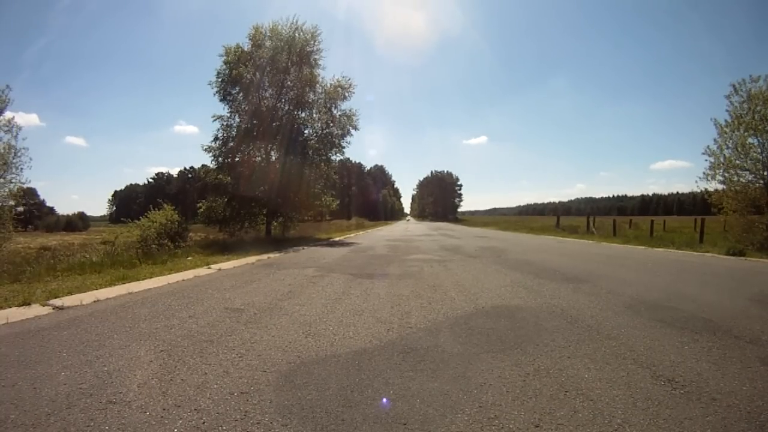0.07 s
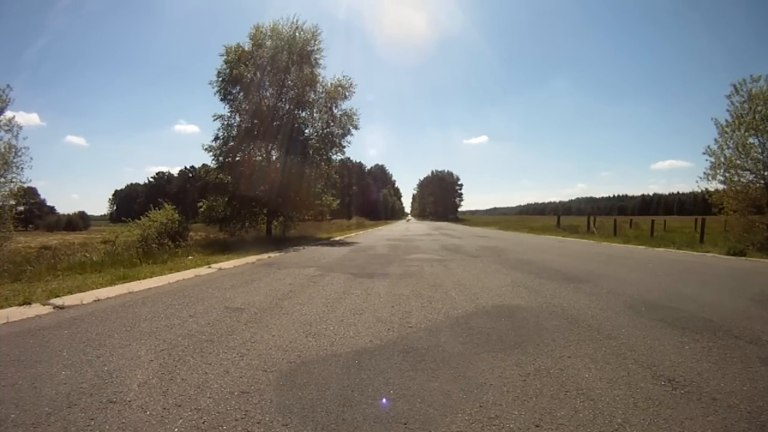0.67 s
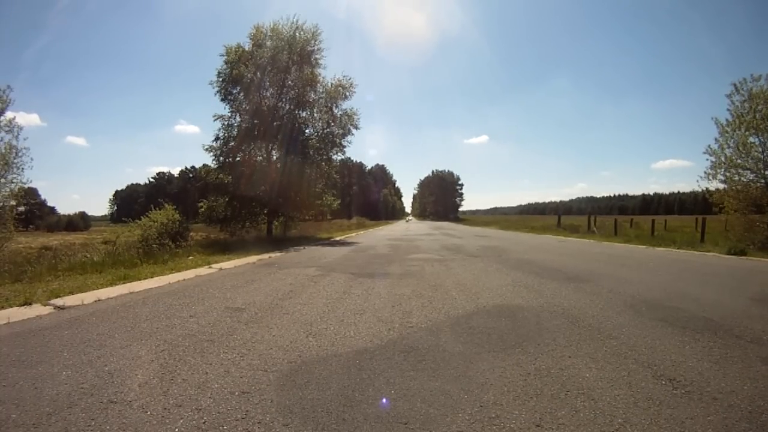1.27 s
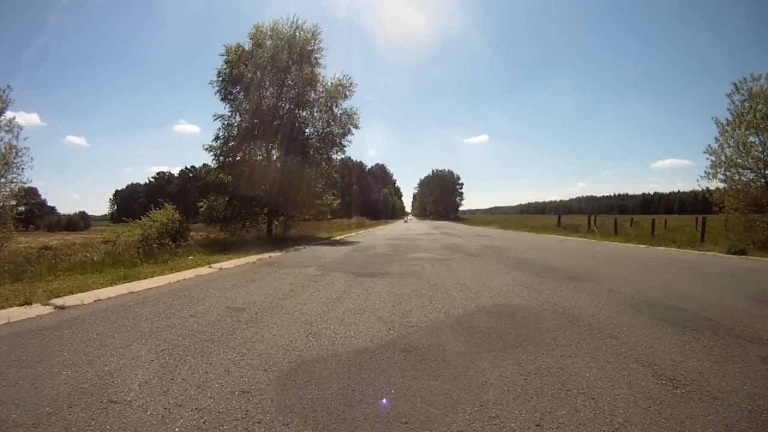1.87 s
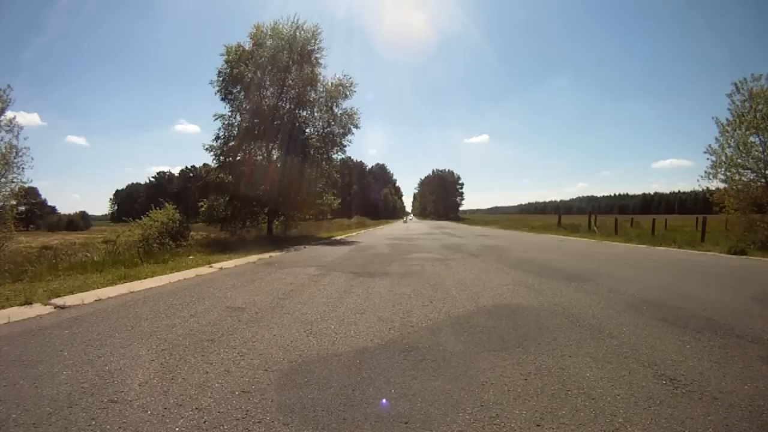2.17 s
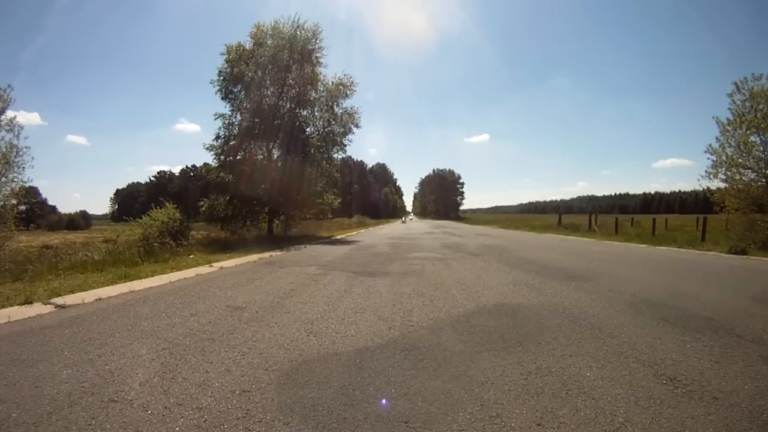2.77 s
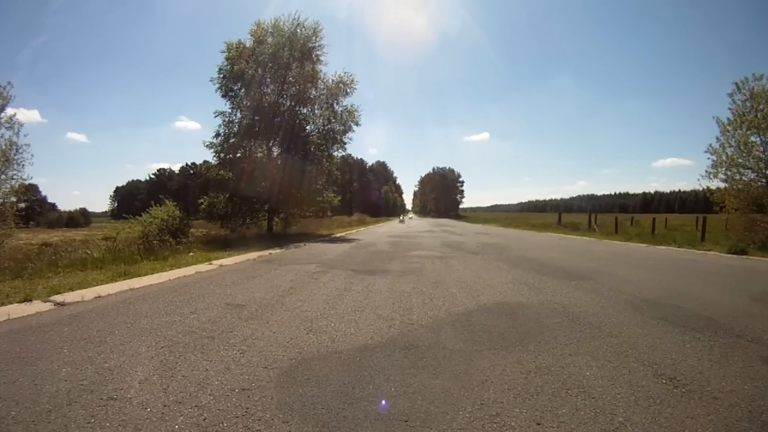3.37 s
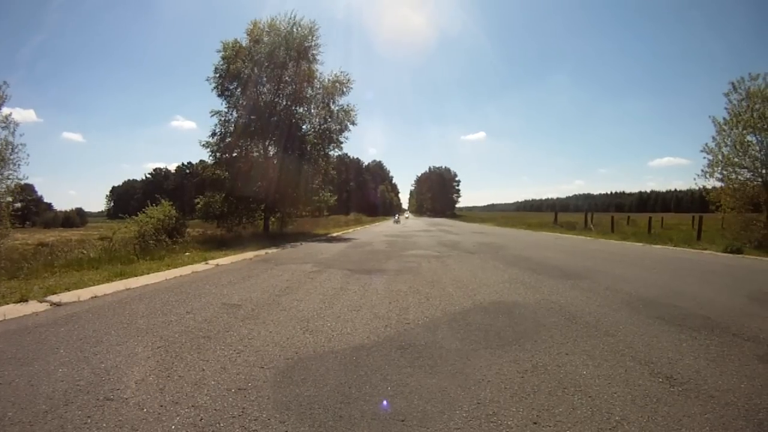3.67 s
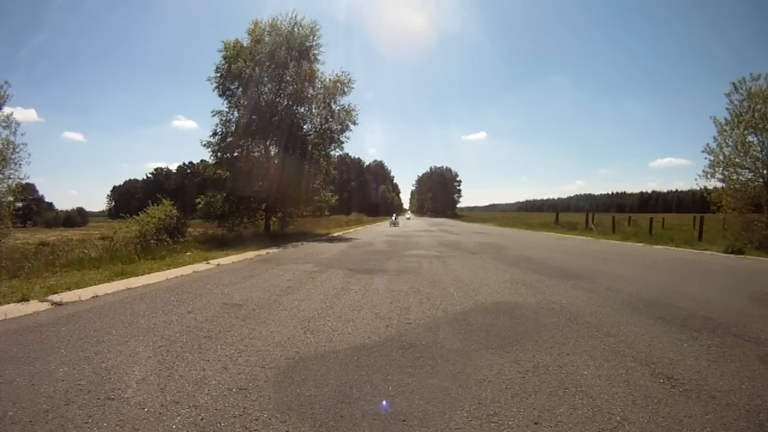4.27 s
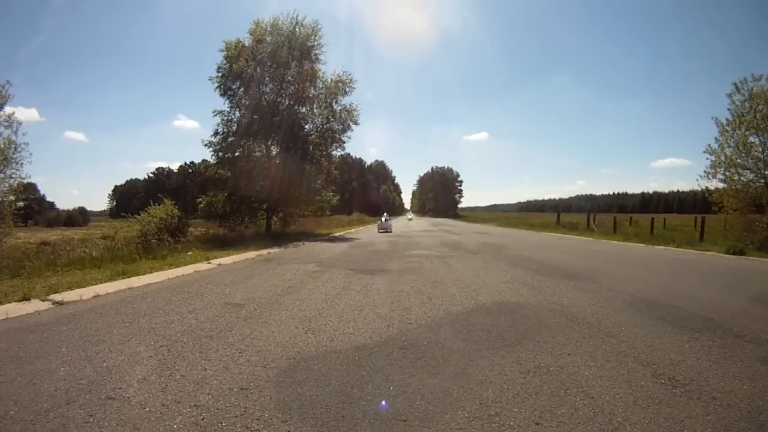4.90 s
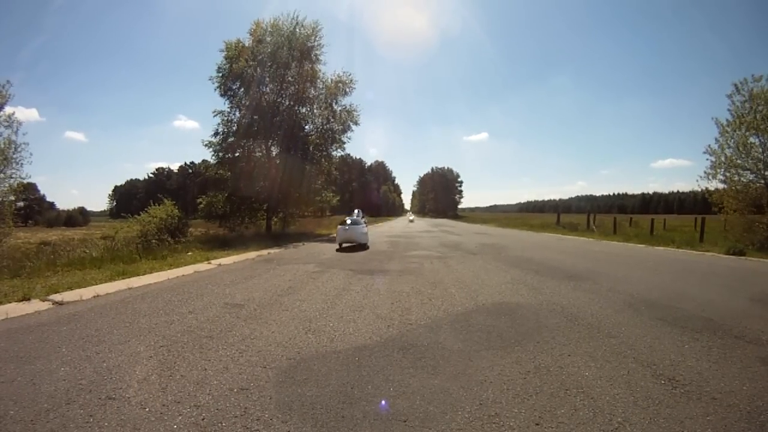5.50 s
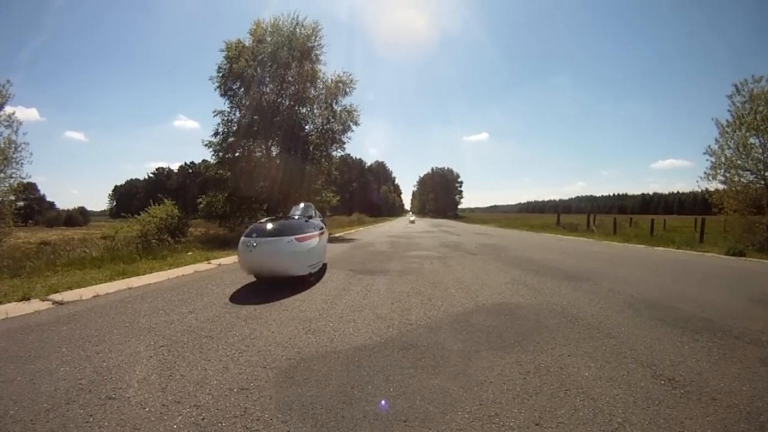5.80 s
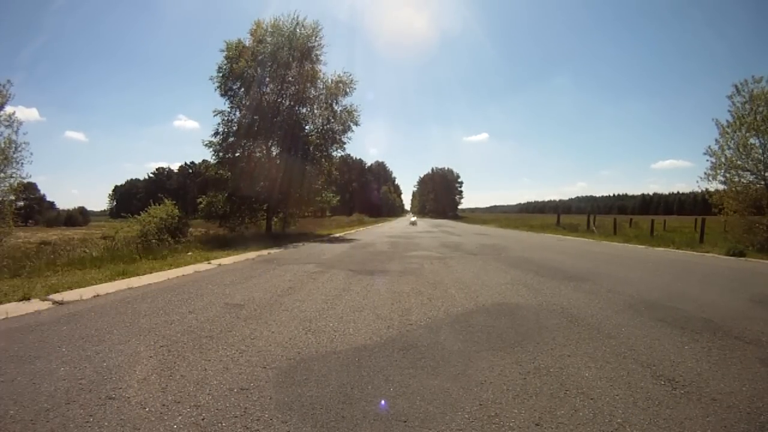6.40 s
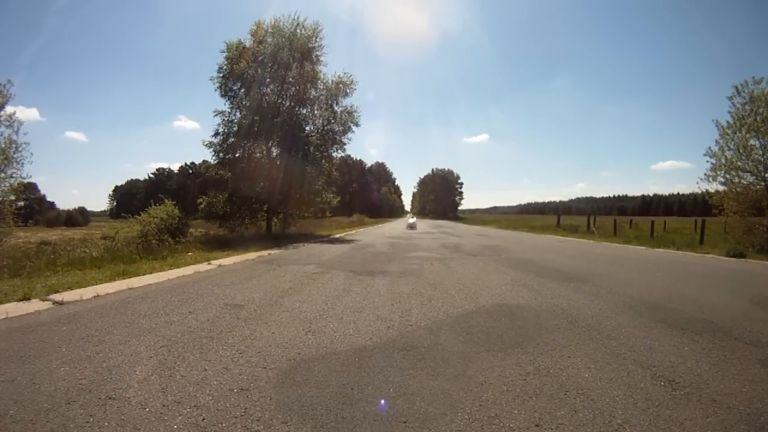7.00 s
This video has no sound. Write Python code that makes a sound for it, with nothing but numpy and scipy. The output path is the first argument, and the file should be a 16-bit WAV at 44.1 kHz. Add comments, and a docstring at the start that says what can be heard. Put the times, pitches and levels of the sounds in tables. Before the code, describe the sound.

A distant rolling rumble and tyre hiss grow out of the soft hush of fields, with faint bird chirps and a few tiny dry ticks. A shell-bodied pedal vehicle is coming fast along the asphalt. It whooshes past close to the low microphone, its hollow drone falling in pitch as bumps knock the shell and its wake buffets the microphone, then starts fading away.

```python
"""A country road, with a small camera standing on the asphalt; a velomobile passes 3.2 m off at 20 m/s.
Its tyres hiss on the grit and drum on the hollow shell, whose note drops as it goes by; bumps knock
the shell and the wake drags a gust over the microphone. Around it: the hush of fields, birds in the
trees, puffs of breeze, a few dry ticks. The camera samples slowly and holds each sample, which mirrors
everything into the treble."""
import sys
import numpy as np
from scipy import signal
from scipy.fft import rfft, irfft
from scipy.io import wavfile
from scipy.ndimage import uniform_filter1d, map_coordinates

SR = 44100
rng = np.random.default_rng(int(sys.argv[2]) if len(sys.argv) > 2 else 0)


def dump_mix(stems):
    """Bounce the given channels to the path in sys.argv[1] as a 16-bit WAV at rate SR."""
    frames = np.atleast_2d(stems).T  # one column per channel
    limited = np.clip(frames, -1, 1)  # hard clip at full scale
    pcm = np.round(limited * 32767).astype(np.int16)
    wavfile.write(sys.argv[1], SR, pcm)


N = 310905
TIME, BINS = np.arange(N) / SR, np.maximum(np.fft.rfftfreq(N, 1 / SR), 1)
PASS_S, MISS_M, SPEED_M_S = 6.23, 3.2, 20.0   # when and how near it passes the microphone, how fast
VIEW_DEG = [15, 42, 66, 148]   # bearings that show the microphone its nose, quarter, flank and tail

# swings of the rolling noise, distance aside: t/s, rumble and drumming level/dB, hiss level/dB
ROLLING_LEVELS = [(0.0, 1.3, -1), (1.2, 5.5, 0.5), (1.48, 7, 5.5), (2.7, 3.5, 5.5), (4.25, -0.1, 0.5),
                  (5.45, -1, 1.5), (5.64, -1, -3), (5.8, 1, 0.8), (6.37, -1, -0.5), (6.425, 0.5, 1.5),
                  (6.49, -1.7, -2), (6.65, -0.3, -2.5), (7.05, 0, 2)]
# coarse stretches of asphalt: t/s, length/s, added level/dB
COARSE_ASPHALT = [(4.57, 0.25, 5), (5.09, 0.14, 3), (5.55, 0.16, 4), (5.88, 0.13, 2), (6.19, 0.1, 0.5)]
# road rumble, heard from ahead and from behind: f/Hz, relative level/dB
RUMBLE_COMING = [(25, -26), (42, -16), (58, -1.5), (100, -0.5), (170, 0.1), (220, -2.5), (265, -9.5),
                 (350, -6), (470, -8.5), (600, -7.5), (800, -47), (1500, -47.5)]
RUMBLE_GOING = [(25, -28), (42, -34), (58, 0), (110, 0.5), (160, -3), (205, -1.5), (295, 4), (350, -6),
                (440, -6.5), (600, -2), (800, -25), (1500, -44.5)]
# resonances of the shell, and bands of the hiss heard head-on: f/Hz, width/Hz, relative level/dB
SHELL_MODES = [(579.3, 42.4, -0.5), (521.5, 79, -5), (396, 110, -16), (640, 120, -21)]
NOSE_BANDS = [(811, 116, 2.5), (938, 82, -0.5), (1145, 120, 1.3), (1247, 163, 3.5), (1617, 133, 4.5),
              (1780, 270, -0.5), (2265, 264, 1), (2573, 110, 4), (2898, 270, 1.5), (3320, 380, -6),
              (3800, 220, -11), (4730, 1400, -18)]
# tyre hiss from the other three sides, and its finest sizzle: f/Hz, relative level/dB
QUARTER_SPECTRUM = [(400, -10), (750, -3), (950, 3), (1130, -5), (1350, 2.5), (1680, -1), (2020, -6),
                    (2250, 0.5), (2700, -4.5), (3020, 5), (3450, -13), (4200, -17), (5000, -17.5),
                    (5900, -21)]
FLANK_SPECTRUM = [(400, -27), (700, -5), (870, 6), (1200, 2.5), (1500, -2.5), (1950, 1), (2120, 6),
                  (2700, 7), (3220, 3), (3500, -7), (4400, -7.5), (5200, -14), (5900, -11)]
TAIL_SPECTRUM = [(400, 3.5), (690, 10.5), (770, -0.5), (920, 6.5), (1400, -2.5), (1600, 1), (1880, -4),
                 (2200, 2.5), (2420, 0.5), (2950, 2), (3600, -10), (4400, -17), (5000, -18), (5900, -27)]
SIZZLE_SPECTRUM = [(2500, -25), (3600, 0), (4400, 7), (5200, -5), (5900, -10)]
# hush of the fields; breeze and wake on the microphone: f/Hz, relative level/dB
FIELD_SPECTRUM = [(30, 20), (200, 8.5), (600, 7), (800, 4), (1400, -1.5), (2400, -3), (3300, -2),
                  (4500, -5), (5300, -4.5), (5900, -4.5)]
BREEZE_SPECTRUM = [(10, -9), (25, 2.5), (55, -3), (90, -10.5), (160, -11), (400, -42), (900, -70)]
WAKE_SPECTRUM = [(20, -26), (38, -14), (50, 3), (66, 0), (85, -5), (130, -19), (300, -44), (900, -75)]
# bird note shapes by name: share of the note spent fading, pitch ratios at even steps
NOTE_SHAPES = {"swoop": (.3, [1.02, 1, .99, 1.01, 1.05, 1.09, 1.09]),
               "rise": (.4, [.94, .975, 1.01, 1.045, 1.06, 1.055]), "level": (.6, [.97, 1, 1.015, 1.01]),
               "sag": (.6, [1.025, 1.01, .99, .965]), "slur": (.85, [1.38, 1.18, 1.02, .9, .8]),
               "hook": (.5, [.95, .975, 1, 1.025, 1, .9, .79]),
               "dip": (.2, [1.34, 1.16, 1.02, 1, 1.04, 1.13, 1.21]),
               "flick": (.4, [.9, .92, .99, 1.09, 1.17])}
# single calls: t/s, length/s, f/Hz, level/dB, echo re note/dB, shape
BIRD_CALLS = [(0.071, 0.12, 2977, -54.5, -3.5, "swoop"), (0.545, 0.074, 3770, -67, -3, "level"),
              (0.659, 0.06, 4340, -62, -1, "sag"), (0.8, 0.098, 3055, -54.5, -4.5, "rise"),
              (0.944, 0.11, 2245, -63.5, -11, "level"), (5.718, 0.041, 3980, -52, 2, "sag")]
# repeated notes: t/s, count, period/s, length/s, f/Hz, first level/dB, step/dB, echo re note/dB, shape
BIRD_PHRASES = [(1.277, 2, 0.099, 0.028, 5050, -66, 1, -2, "sag"),
                (2.823, 2, 0.168, 0.036, 4420, -72, 1, 11.5, "flick"),
                (3.968, 3, 0.16, 0.029, 4700, -69, -1, -8, "sag"),
                (4.704, 4, 0.101, 0.061, 4520, -56, 1.9, -4, "hook"),
                (5.127, 3, 0.172, 0.096, 3844, -51.5, 1.5, -4, "dip"),
                (5.641, 2, 0.21, 0.062, 3770, -49, 2, 3, "flick")]
# one bird's run of falling chirps: t/s, f/Hz, level/dB
BIRD_CHIRPS = [(1.603, 3200, -59), (1.83, 3300, -64), (2.03, 3400, -63), (2.229, 3130, -58),
               (2.442, 3140, -57.5), (2.655, 3180, -57), (2.87, 3200, -55.5), (3.092, 3280, -57),
               (3.315, 3400, -60), (3.553, 3200, -63)]
# puffs of breeze, and eddies running ahead of the vehicle: t/s, length/s, level/dB
BREEZE_PUFFS = [(0.528, 0.14, -46.5), (0.703, 0.11, -45.5), (.76, 0.041, -37), (1.01, 0.12, -48.5),
                (1.24, 0.048, -49), (1.767, 0.083, -50), (1.84, 0.031, -46), (2.47, 0.28, -50.5)]
LEADING_EDDIES = [(5.772, 0.045, -32), (5.848, 0.04, -24.5), (5.92, 0.042, -25.5)]
# small dry ticks: t/s, peak level/dB, f/Hz
DRY_TICKS = [(2.52, -45.5, 2830), (2.625, -57, 4600), (2.990, -49, 4330), (3.163, -52, 1500),
             (4.439, -47, 2720), (4.452, -55, 4600), (4.567, -53, 3400), (4.924, -37, 2800)]
# knocks from bumps in the road: t/s, peak level/dB
ROAD_BUMPS = [(3.583, -38.5), (3.652, -40.5), (3.684, -45), (5.934, -21.5), (5.990, -16.5), (6.325, -18),
              (6.372, -11.5), (6.522, -24.5), (6.541, -20), (6.81, -37)]


def from_db(db):
    """Decibels to gain."""
    return 10 ** (np.asarray(db) / 20)


def unit_rms(x):
    """Scale to rms 1."""
    return x / np.sqrt(np.mean(x ** 2) + 1e-20)


def coloured(x, spectrum):
    """Give a steady signal a spectrum; rms 1."""
    hz, db = np.transpose(spectrum)
    curve_db = np.interp(np.log(BINS), np.log(hz), db)
    return unit_rms(irfft(rfft(x) * from_db(curve_db), N))


def resonant(x, modes):
    """Pass a steady signal through steep-sided resonances; rms 1."""
    power = sum(from_db(db) ** 2 / (1 + ((BINS - hz) / (width / 2)) ** 2) ** 2 for hz, width, db in modes)
    return unit_rms(irfft(rfft(x) * np.sqrt(power), N))


def swell(s, length):
    """A bell-shaped rise and fall centred on time s."""
    return np.exp(-(2 * (TIME - s) / length) ** 2)


def add(out, s, sound):
    """Mix a short sound in at time s."""
    at = max(round(s * SR), 0)
    out[at:at + len(sound)] += sound[:N - at]


def distance(lag_s=0):
    """Metres from the microphone to the vehicle on its straight course."""
    return np.hypot(MISS_M, SPEED_M_S * (TIME - PASS_S - lag_s))


def pass_gain(base_db, db_per_doubling, lag_s):
    """Gain that falls with distance from the microphone, highest lag_s after the pass."""
    return from_db(base_db - db_per_doubling * np.log2(distance(lag_s) / MISS_M))


def views(bearing_deg):
    """Equal-power shares of nose, quarter, flank and tail facing the microphone."""
    return [np.sqrt(np.interp(bearing_deg, VIEW_DEG, view)) for view in np.eye(len(VIEW_DEG))]


def grit(lumpy_db, patch_hz):
    """Force of rough asphalt on a tyre: noise that swells with each patch of stones."""
    patches = unit_rms(irfft(rfft(rng.standard_normal(N)) / (1 + (BINS / patch_hz) ** 2), N))
    return rng.standard_normal(N) * from_db(lumpy_db * patches)


def road_rumble(bearing_deg):
    """Low noise of tyres on asphalt, one colour coming and another going."""
    nose, quarter, flank, tail = views(bearing_deg)
    coming = np.hypot(nose, quarter) * coloured(grit(lumpy_db=1.24, patch_hz=2.6), RUMBLE_COMING)
    going = np.hypot(flank, tail) * coloured(grit(lumpy_db=1.24, patch_hz=7.9), RUMBLE_GOING)
    return pass_gain(base_db=-18.5, db_per_doubling=7.445, lag_s=-0.028) * (coming + going)


def shell_drumming(doppler):
    """The tyres drum on the hollow shell; its note is squeezed coming in and stretched going away."""
    drumming = resonant(grit(lumpy_db=0.16, patch_hz=56), SHELL_MODES)
    shifted = map_coordinates(drumming, [np.cumsum(doppler) % (N - 1)], order=1)
    return pass_gain(base_db=-21.5, db_per_doubling=8.6, lag_s=0.0087) * shifted


def tyre_hiss(bearing_deg, beam_deg=133, spread_deg=36):
    """Tyres on grit: narrow bands from ahead, broad and bright from the side."""
    nose, *sides = views(bearing_deg)
    hiss = nose * resonant(grit(lumpy_db=0.82, patch_hz=68), NOSE_BANDS)
    for share, spectrum in zip(sides, (QUARTER_SPECTRUM, FLANK_SPECTRUM, TAIL_SPECTRUM)):
        hiss += share * coloured(grit(lumpy_db=0.82, patch_hz=29), spectrum)
    # the finest sizzle escapes sideways and backwards from under the shell
    beam = np.exp(-((bearing_deg - beam_deg) / spread_deg) ** 2)
    hiss += from_db(-14) * beam * coloured(grit(lumpy_db=3.0, patch_hz=44), SIZZLE_SPECTRUM)
    return pass_gain(base_db=-24.5, db_per_doubling=7.25, lag_s=0.053) * over_ground(hiss)


def over_ground(hiss, midpoint_m=34.8, blend_m=6.5, loss_db=7.5, treble_hz=1680, treble_loss_db=6.5):
    """From far off the hiss grazes the ground, which absorbs its treble most."""
    grazing = 1 / (1 + np.exp((midpoint_m - distance()) / blend_m))
    low = signal.sosfiltfilt(signal.butter(2, treble_hz, fs=SR, output="sos"), hiss)
    treble = (hiss - low) * from_db(-treble_loss_db * grazing)
    return from_db(-loss_db * grazing) * (low + treble)


def velomobile():
    """The pass from nose to tail; coarse asphalt lifts the rumble and the drumming."""
    bearing = np.arctan2(MISS_M, SPEED_M_S * (PASS_S - TIME))   # 0 coming, pi leaving
    doppler = 1 / (1 - np.cos(bearing) * SPEED_M_S / 343)
    times, *levels = np.transpose(ROLLING_LEVELS)
    body_db, hiss_db = [np.interp(TIME, times, level) for level in levels]
    coarse_db = sum(db * swell(s, length) for s, length, db in COARSE_ASPHALT)
    rumble = from_db(body_db + coarse_db) * road_rumble(np.degrees(bearing))
    drumming = from_db(body_db + 0.88 * coarse_db) * shell_drumming(doppler)
    hiss = from_db(hiss_db) * tyre_hiss(np.degrees(bearing))
    return rumble + drumming + hiss + shell_knocks(doppler)


def field_hush(level_db=-57.5):
    """The steady hush of open fields all round."""
    return from_db(level_db) * coloured(rng.standard_normal(N), FIELD_SPECTRUM)


def bird_notes(chirp_s=0.039, growth_s=0.0028, chirp_echo_db=-65):
    """Every note sung, in the columns of BIRD_CALLS; each chirp is a little longer than the last."""
    notes = list(BIRD_CALLS)
    for s, count, period, length, hz, db, step_db, echo_db, shape in BIRD_PHRASES:
        for k in range(round(count)):
            notes.append((s + k * period, length, hz, db + k * step_db, echo_db, shape))
    for k, (s, hz, db) in enumerate(BIRD_CHIRPS):
        notes.append((s, chirp_s + k * growth_s, hz, db, chirp_echo_db - db, "slur"))
    return notes


def birds(waver=0.0087, echo_t60_s=0.63):
    """Near-pure gliding whistles; the deeper a bird sits in the trees, the more its note is scattered."""
    direct, scattered = np.zeros((2, N))
    for s, length, hz, db, echo_db, shape in bird_notes():
        size = int(length * SR)
        fading, ratios = NOTE_SHAPES[shape]
        glide = np.interp(np.linspace(0, 1, size), np.linspace(0, 1, len(ratios)), ratios)
        tremor = unit_rms(uniform_filter1d(rng.standard_normal(SR // 4), size=150))[:size]
        pitch = hz * glide * (1 + waver * tremor)
        note = from_db(db) * signal.windows.tukey(size, fading) * np.sin(2 * np.pi * np.cumsum(pitch) / SR)
        add(direct, s, note)
        add(scattered, s, from_db(echo_db) * note)
    trees = rng.standard_normal(SR) * np.exp(-np.log(1000) * TIME[:SR] / echo_t60_s)
    return direct + signal.fftconvolve(scattered, trees / np.linalg.norm(trees))[:N]


def breeze():
    """Light puffs of air buffet the microphone."""
    puffs = sum(from_db(db) * swell(s, length) for s, length, db in BREEZE_PUFFS)
    return puffs * coloured(rng.standard_normal(N), BREEZE_SPECTRUM)


def ticks(decay_s=0.0044):
    """Small dry ticks: brief narrow bursts of noise."""
    out, t = np.zeros(N), TIME[:SR // 25]
    for s, db, hz in DRY_TICKS:
        band = signal.butter(2, [hz * 0.84, hz * 1.14], "band", fs=SR, output="sos")
        burst = signal.sosfilt(band, rng.standard_normal(len(t)) * np.exp(-t / decay_s))
        add(out, s, from_db(db) * burst / np.abs(burst).max())
    return out


def shell_knocks(doppler, rise_s=0.01, decay_s=0.0056):
    """Each bump rings the shell's main mode, at the pitch reaching the microphone at that moment."""
    out, t = np.zeros(N), TIME[:SR // 10]
    envelope = (1 - np.exp(-t / rise_s)) * np.exp(-t / decay_s)
    envelope /= envelope.max()
    for s, db in ROAD_BUMPS:
        ring_hz = SHELL_MODES[0][0] * np.interp(s, TIME, doppler)
        add(out, s, from_db(db) * envelope * np.sin(2 * np.pi * ring_hz * t))
    return out


def wake(peak_s=6.15, peak_db=-20.5, rise_db_per_s=192, fall_db_per_s=62):
    """Eddies reach the microphone first; the wake hits as the vehicle draws level, then dies away."""
    below_peak_db = np.maximum(rise_db_per_s * (peak_s - TIME), fall_db_per_s * (TIME - peak_s))
    gust = from_db(peak_db - below_peak_db)
    eddies = sum(from_db(db) * swell(s, length) for s, length, db in LEADING_EDDIES)
    return (gust + eddies) * coloured(rng.standard_normal(N), WAKE_SPECTRUM)


def scene():
    """Everything at the one microphone, down at road level."""
    return (velomobile() + birds() + ticks() + field_hush() + breeze() + wake())[None]


def record(dry, guard_hz=5300, hold_hz=12000, clock_hz=48000, cutoff_hz=15300):
    """The camera band-limits and samples slowly; held samples mirror the sound upward; the top is cut."""
    guarded = signal.sosfilt(signal.butter(8, guard_hz, fs=SR, output="sos"), dry)
    slow = signal.resample_poly(guarded, hold_hz, SR, axis=-1)
    held = np.repeat(slow, clock_hz // hold_hz, axis=-1)
    mirrored = signal.resample_poly(held, SR, clock_hz, axis=-1)[:, :N]
    top_cut = signal.firwin(801, cutoff_hz, fs=SR, window="blackman")
    return signal.fftconvolve(mirrored, top_cut[None], "same")


dry = scene()
out = record(dry)
dump_mix(out)
```